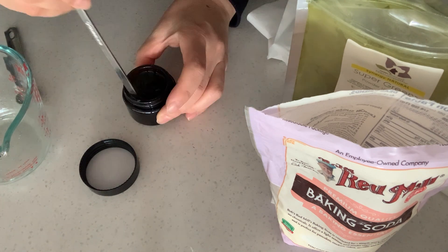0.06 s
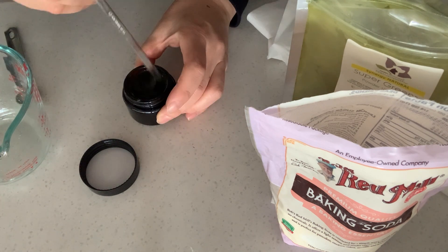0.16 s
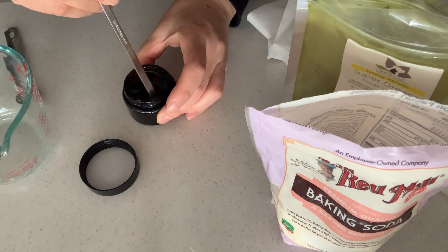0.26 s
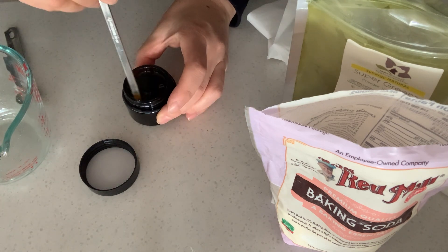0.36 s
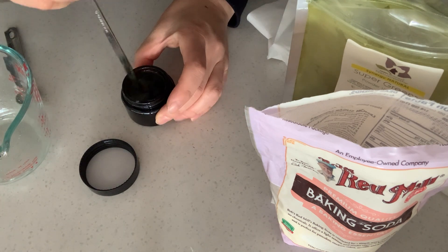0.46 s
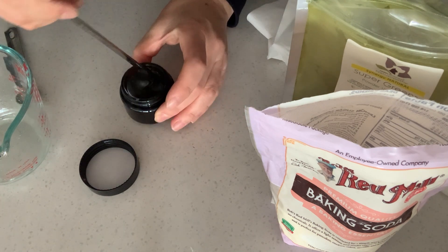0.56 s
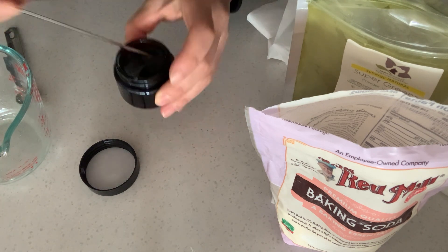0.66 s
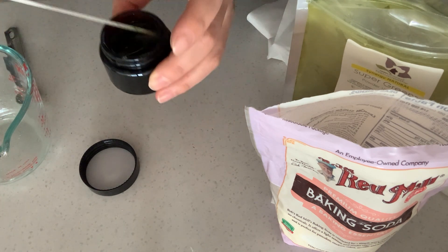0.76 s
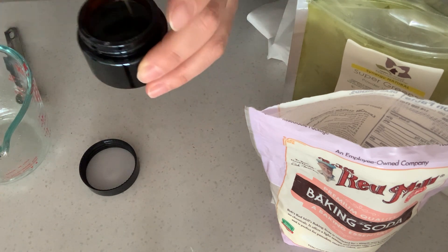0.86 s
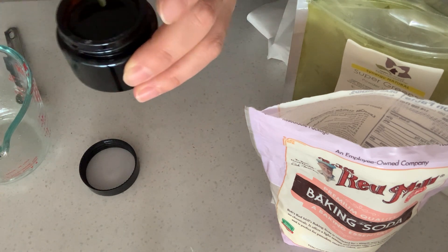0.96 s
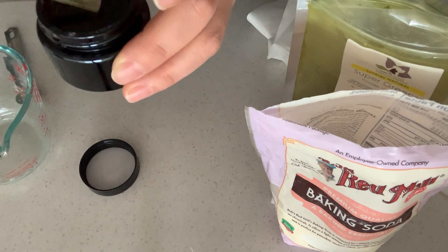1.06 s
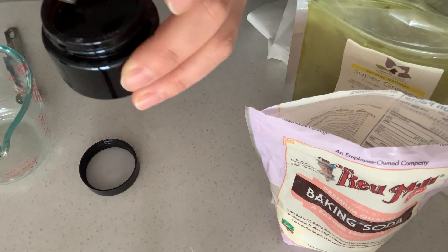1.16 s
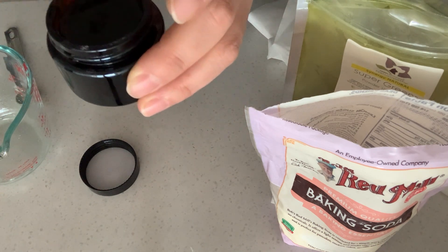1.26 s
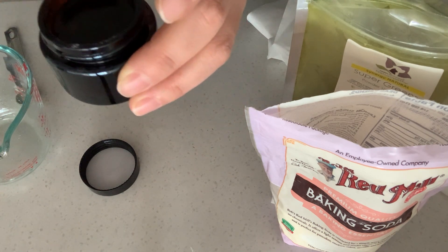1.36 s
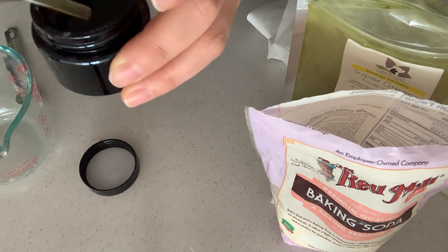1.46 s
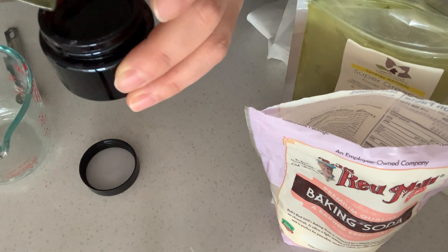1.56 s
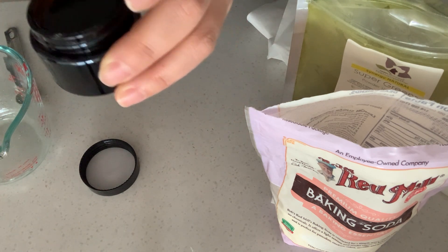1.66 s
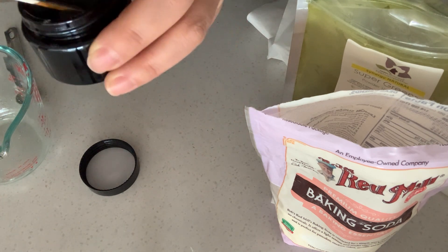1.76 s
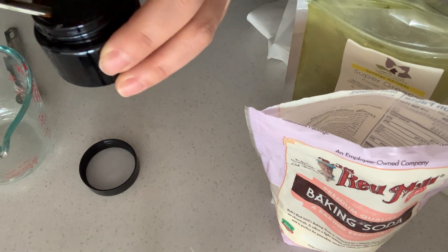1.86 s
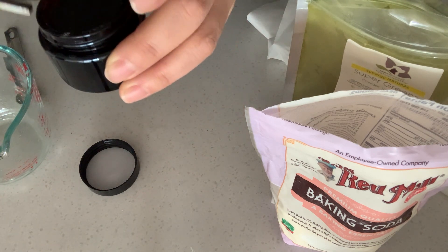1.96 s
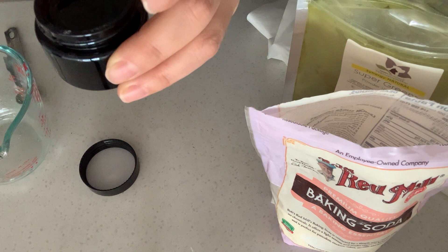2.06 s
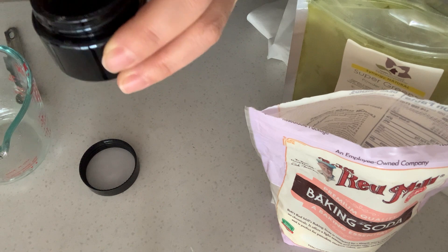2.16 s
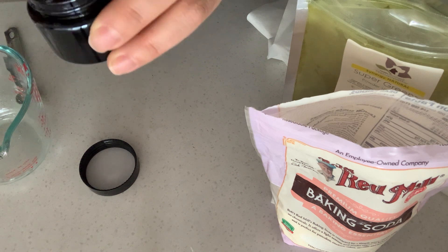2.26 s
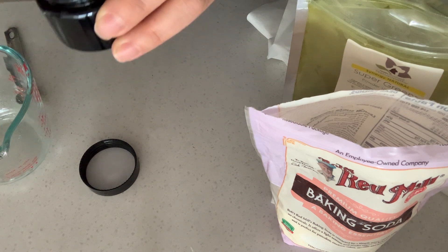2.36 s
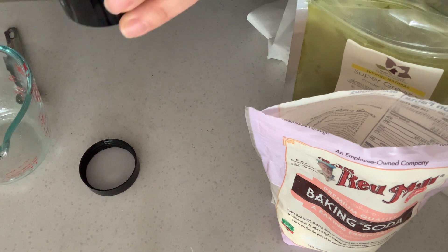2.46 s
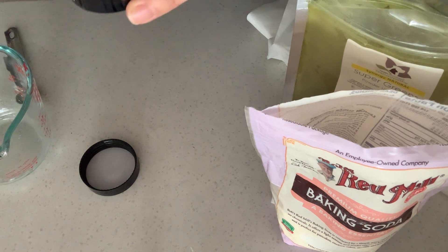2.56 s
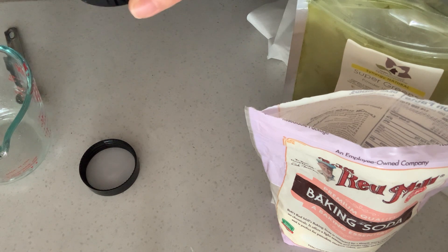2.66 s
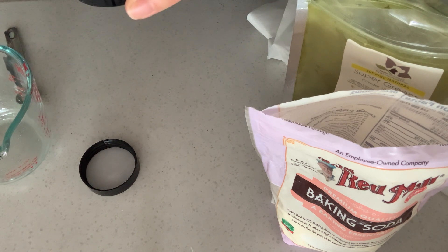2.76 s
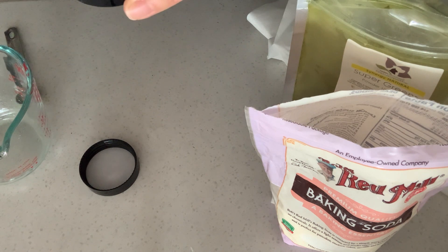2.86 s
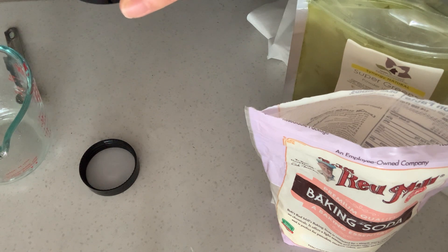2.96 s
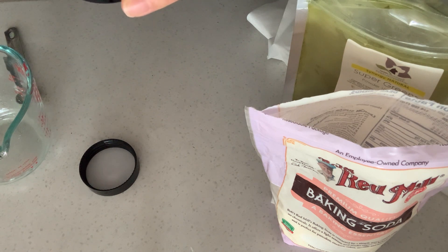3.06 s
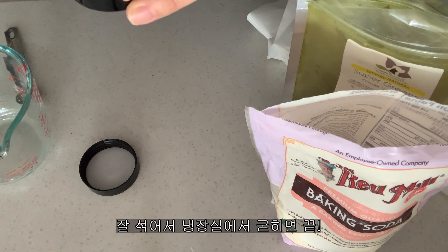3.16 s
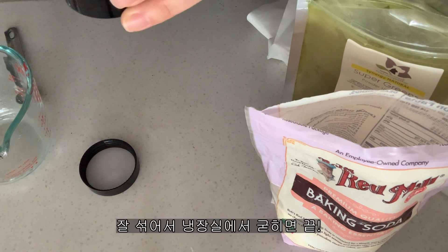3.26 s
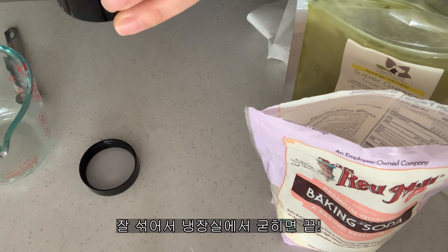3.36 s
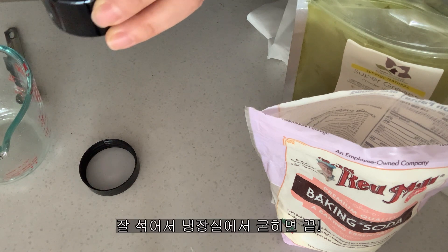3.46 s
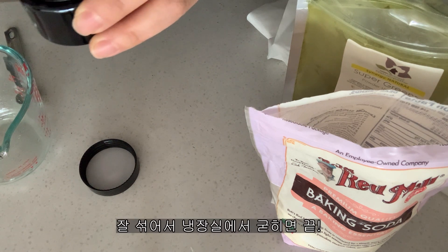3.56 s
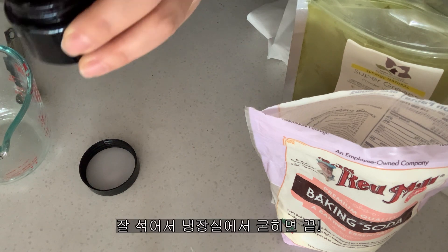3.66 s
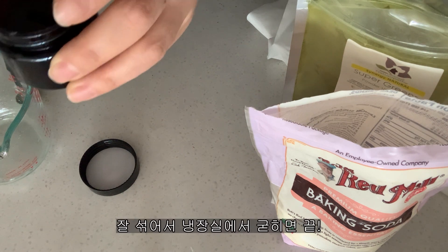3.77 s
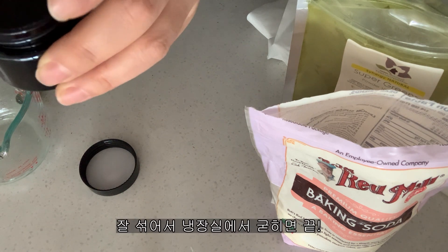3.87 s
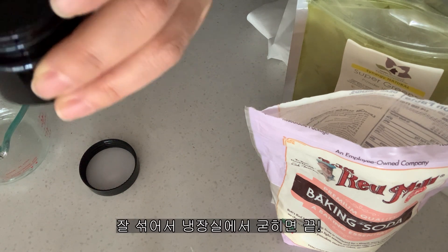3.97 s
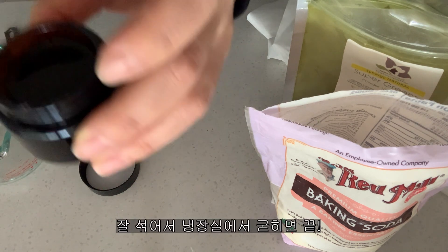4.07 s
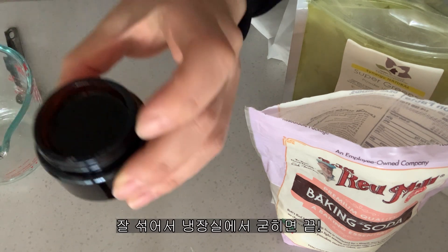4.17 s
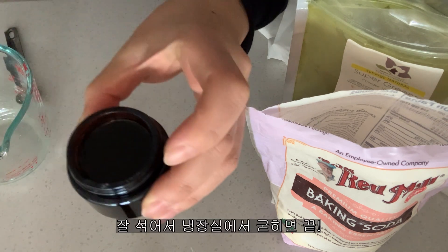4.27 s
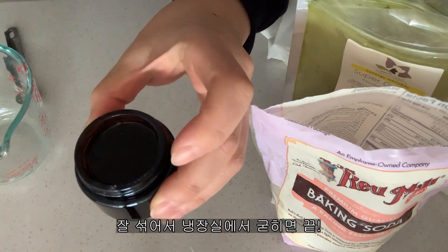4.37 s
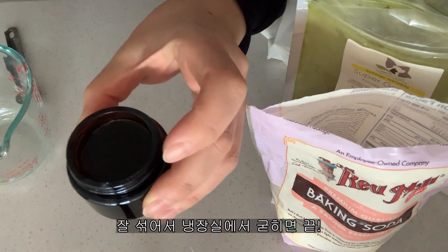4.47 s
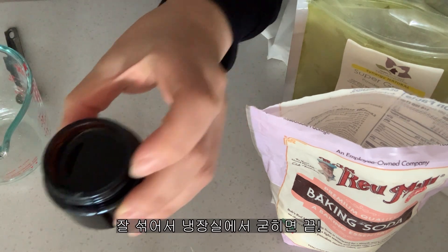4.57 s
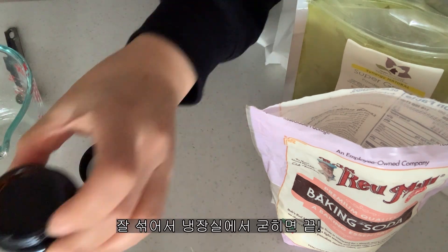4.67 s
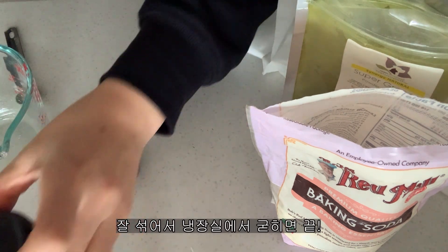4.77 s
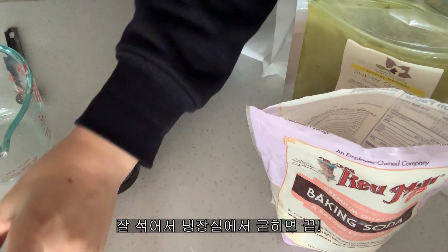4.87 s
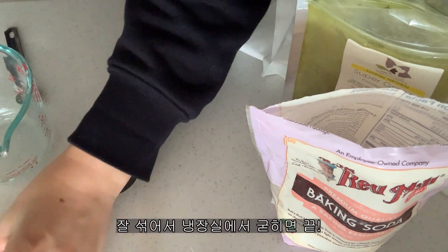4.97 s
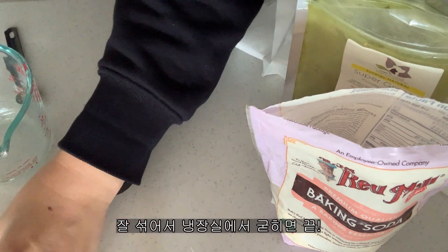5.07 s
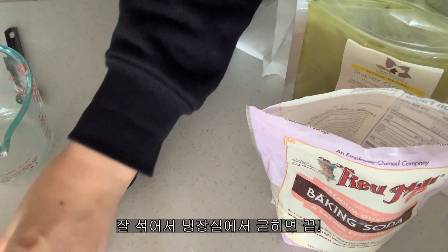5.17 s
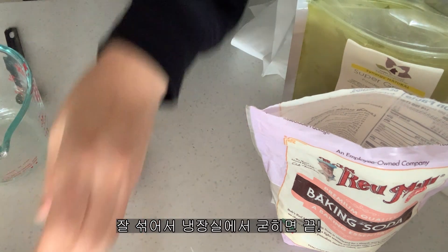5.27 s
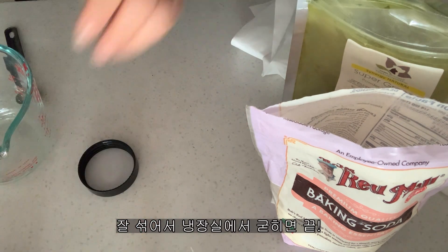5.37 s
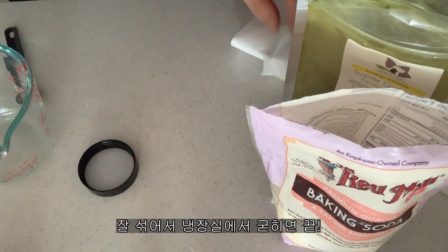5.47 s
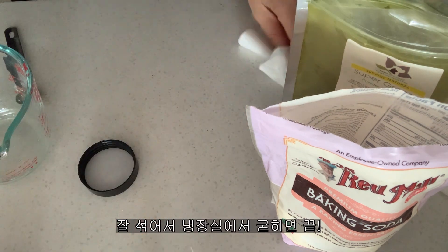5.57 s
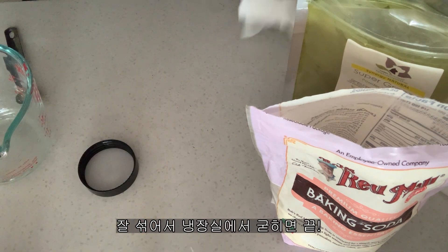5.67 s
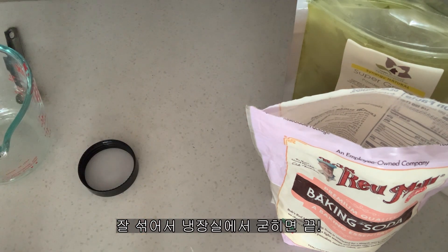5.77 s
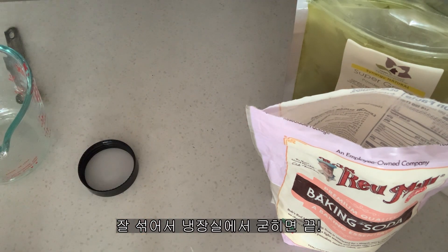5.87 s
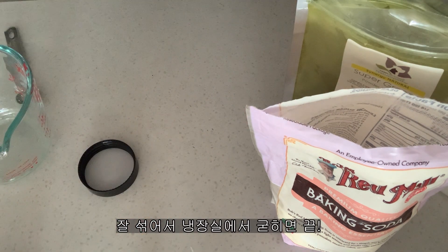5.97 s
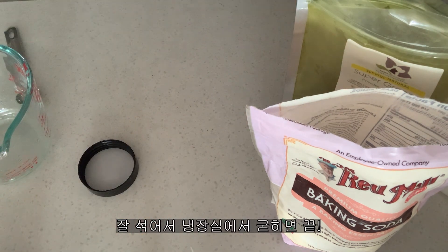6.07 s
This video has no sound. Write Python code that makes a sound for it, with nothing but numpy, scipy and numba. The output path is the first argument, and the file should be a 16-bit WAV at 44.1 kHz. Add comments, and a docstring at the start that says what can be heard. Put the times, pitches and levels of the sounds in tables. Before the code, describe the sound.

Bright metal-on-glass ticks and short scrapes from stirring a little jar, a sharp set-down on stone, then faint squeak and rustle over fridge hum.

```python
"""After a tenth of a second of silence a small glass jar knocks on a counter and scuffs along it.
A metal spatula taps the jar and scrapes the glass; the jar is set down with bounces.
At the end a hand squeaks, bumps and rustles. A fridge hums through a quiet, hard-walled kitchen.
Blows are short rough shocks that ring sets of tones; scrapes and rustles are grainy noise through
filters; the squeak is a stack of narrow noise bands; the hum is a stack of sines."""
import sys
import numpy as np
from scipy import signal
from scipy.fft import rfft, irfft, next_fast_len
from scipy.io import wavfile
from scipy.ndimage import uniform_filter1d
from numba import njit

SR = 44100
rng = np.random.default_rng(int(sys.argv[2]) if len(sys.argv) > 2 else 0)


def put_to_file(sound):
    """Save the sound as 16-bit audio at rate SR, in the file named by the first command-line argument."""
    columns = np.atleast_2d(sound).T  # one column per channel
    safe = np.clip(columns, -1, 1)
    whole_steps = np.round(safe * 32767)
    wavfile.write(sys.argv[1], SR, whole_steps.astype(np.int16))


N = 269892  # length [samples]

# Spatula hits on the jar wall: (time [s], peak level before panning [dB], tilt [dB per octave],
# spatula ring [dB], jar ring [dB])
TAPS = [(0.5896, -54, -1, -19, -9), (0.7233, -51.5, -8.5, 4, 0), (1.1062, -27.5, -1.5, -5, -5.5),
        (1.466, -24, -2.5, 3, -16), (1.787, -23, 2, -5.5, 0.5), (1.8382, -44.5, -5, 8, 7),
        (1.9435, -48.5, 6.5, 6, 0.5), (2.2366, -25.5, 1.5, 8, 9), (2.2905, -33, -0.5, 0, 20),
        (2.4522, -47, 6.5, 1, 19), (2.5256, -43, -3.5, -5.5, 2), (2.9976, -52, 12, 13, -6),
        (3.0295, -28.5, 0, 4.5, 2.5), (3.3782, -18.5, 2.5, 3, -4.5), (3.438, -59, 2, 6, 0),
        (3.6212, -16.5, 4, 8, 8), (3.677, -36.5, 4.5, 6, 3), (3.8302, -39.5, 7, -3, 1),
        (3.845, -57, 8.5, -17, 1.5), (4.1994, -67.5, -4, -9, 9), (4.2697, -50, -7, -23.5, 5),
        (4.3616, -60, -4, -2.5, -3), (4.4684, -60.5, -8, 9, 2), (4.9217, -52.5, -3, -15, 9),
        (5.187, -57, 4.5, -15, 7.5), (5.198, -51.5, 4, -13, -6), (5.234, -47, 8, -12, -12)]
# Tones of the spatula: (frequency [Hz], relative level [dB], time to fall 60 dB [s])
SPATULA = [(5300, -12.5, 0.03), (6980, 8, 0.003), (9380, 9, 0.0073), (10460, 12, 0.015), (10640, -5.5, 0.1),
           (12060, -14, 0.06), (15200, -1.5, 0.035)]
# Tones of the jar while a hand holds it: (frequency [Hz], relative level [dB], time to fall 60 dB [s])
HELD_JAR = [(2180, 1.5, 0.0044), (3840, -0.5, 0.0077), (4600, -6, 0.0037), (5860, -0.5, 0.0062),
            (7940, -10.5, 0.0079)]


def taps():
    """Each tap rings the metal spatula and the hand-held jar together."""
    return blows(TAPS, [SPATULA, HELD_JAR], 0.0023, 22.3, 2200, 17000, roughness=.22)


# Spatula dragged along the glass: (start [s], length [s], relative level [dB], level change [dB],
# squeal at its height [dB], jar ring [dB], blade resonance at start [Hz], at end [Hz],
# middle of its move [0-1 of the stroke])
STROKES = [(1.111, 0.15, -74, -9, 12.5, -8, 4950, 6600, 0.4),
           (1.474, 0.1, -71.5, 0.5, 17.5, -10.5, 5200, 6650, .65),
           (1.796, 0.15, -63, -17, 11.5, -7, 4400, 7600, 0.45),
           (2.229, 0.05, -63, -7, -14, 19, 3870, 4000, 0.4),
           (2.291, 0.03, -73, -16, 8, 11, 3700, 4040, 0.6), (2.516, 0.037, -79, -6, 22, 2, 7070, 7410, .5),
           (3.064, 0.15, -69, -10, 9, -5.5, 3700, 8100, .65),
           (3.371, 0.07, -58, -2.5, -2, -4.5, 5280, 6500, 0.7),
           (3.617, 0.041, -45, -16, -9, 0, 4840, 5080, .5),
           (3.676, 0.024, -61, -5.5, 8, -7, 5300, 5900, 0.14),
           (3.833, 0.034, -70, -13, 8, 3.5, 4600, 2740, 0.52)]
STROKE_ATTACK_S, STROKE_RELEASE_S = 0.0029, 0.013
SWEEP_SPREAD = .15  # share of the stroke over which the blade resonance makes most of its move
# The squeal peaks this share of the stroke after the middle of the move, and drops to either side
SQUEAL_AFTER, SQUEAL_SPREAD, SQUEAL_DROP_DB = 0.1, 0.3, 10
LOW_MODE, LOW_MODE_DB = .43, -16.5  # a lower blade resonance moves along at this share of the upper
# Tone of the dry scraping: (frequency [Hz], relative level [dB])
SCRAPE_TONE = [(1500, -14.0), (3500, -14.0), (9500, 15.5), (11500, -5.0), (16000, -20.5)]


def scrape():
    """Gritty friction rings the moving resonance of the free blade, the spatula's fixed tones and the jar."""
    grit = rng.standard_normal(N) * amp(2.5 * rng.exponential(size=N) + 2.5 * walk(200))
    blade_hz, drag, squeal, glass = np.full(N, 6000.), 0, 0, 0
    for s, length_s, db, change_db, squeal_db, jar_db, from_hz, to_hz, middle in STROKES:
        along, gain = stroke(s, length_s, db, change_db, STROKE_ATTACK_S, STROKE_RELEASE_S)
        moved = (1 + np.tanh((along - middle) / SWEEP_SPREAD)) / 2
        blade_hz = np.where(along > 0, from_hz + (to_hz - from_hz) * moved, blade_hz)
        drag = drag + gain
        glass = glass + gain * amp(jar_db)
        off_peak = (along - middle - SQUEAL_AFTER) / SQUEAL_SPREAD
        squeal = squeal + gain * amp(squeal_db - SQUEAL_DROP_DB * off_peak ** 2)

    sound = amp(4.0) * unit(colour(grit, SCRAPE_TONE))
    for hz, db, t60 in SPATULA:
        gathered = (t60 / 0.0053) ** 0.94  # longer rings gather more
        sound += amp(db - 13.5) * gathered * unit(svf(grit, np.full(N, 1. * hz), 430.0))

    tremble = 1 + .05 * walk(80)  # the grip trembles
    jar = sum(amp(db + 3.0 * walk(60)) * unit(svf(grit, hz * tremble, 450.0)) for hz, db, _ in HELD_JAR)

    blade_hz = blade_hz * tremble
    low_hz = LOW_MODE * blade_hz
    catching = amp(5 * walk(70))  # it catches and lets go
    upper = unit(svf(svf(grit, blade_hz, 1500.0), blade_hz, 1500.0)) * catching
    lower = unit(svf(svf(grit, low_hz, 600.0), low_hz, 600.0))
    blade = upper + amp(LOW_MODE_DB) * lower
    return amp(-5.5) * (drag * sound + amp(-17.0) * glass * jar + squeal * blade)


# Jar rocking on the counter: (time [s], peak level before panning [dB], tilt [dB per octave],
# jar ring [dB])
KNOCKS = [(0.113, -38, 6, -16.5), (0.189, -34, -4, -16), (0.296, -27.5, 3.5, 11), (0.348, -39.5, 3.5, 8.5),
          (0.483, -59, -4, 1), (0.495, -51.5, 0, 8.5), (0.529, -43, 4, 8)]
# Tones of the jar on the counter: (frequency [Hz], relative level [dB], time to fall 60 dB [s])
JAR = [(550, 1.5, 0.016), (773, -8, 0.059), (990, 1, 0.0088), (1474, -6, 0.05), (1884, -2.5, 0.014),
       (2310, 5, 0.012), (2820, -7, 0.0061), (3210, -12.5, 0.0058), (4600, -7, 0.0056),
       (6070, -9.5, 0.0084), (6880, -0.5, 0.0013), (10000, -13, 0.011)]


def knocks():
    """Each knock of the rocking jar on the counter rings the jar's tones."""
    return blows(KNOCKS, [JAR], 0.0028, 22.7, 810, 3470, roughness=0.22)


# Jar sliding on the counter: (start [s], length [s], level [dB], level change [dB])
SCUFFS = [(0.462, 0.041, -55, -1), (0.505, 0.017, -59.5, -10.5)]
# Tone of the slides: (frequency [Hz], relative level [dB])
SCUFF_TONE = [(700, -29), (1500, 7), (2300, 7.5), (3000, -3.5), (4500, -9.5), (9000, -21), (16000, -37)]


def scuff():
    """Grainy glass-on-stone slides: spiky noise with a fixed tone."""
    grit = rng.standard_normal(N) * amp(2.5 * rng.exponential(size=N) + 3.5 * walk(150))
    return unit(colour(grit, SCUFF_TONE)) * sum(stroke(*row, 0.019, 0.0066)[1] for row in SCUFFS)


# Jar set down with bounces: (time [s], peak level before panning [dB], tilt [dB per octave], ring [dB])
LANDING = [(4.967, -13, -1.5, 2), (4.9759, -14.5, 3, 12.5), (4.98, -25.5, -7.5, -11),
           (4.99, -36, -1.5, -15), (5.001, -33, -4.5, -12)]
# Tones of the counter: (frequency [Hz], relative level [dB], time to fall 60 dB [s])
COUNTER = [(114, -22.5, 0.094), (227, -26.5, 0.1), (365, -13, 0.022), (583, -13, 0.042), (1180, -7, 0.032),
           (1303, -9.5, 0.043), (1760, -6, 0.06), (2170, 0, 0.0057), (2630, -2.5, 0.021), (2910, 6, 0.013),
           (3250, 3, 0.0081), (3615, -1, 0.029), (4350, -7, 0.0043), (5300, 1, 0.01)]


def landing():
    """The jar lands and bounces, ringing the counter; also returns the version that feeds the echo."""
    landed = blows(LANDING, [COUNTER], 0.0027, 26.1, 1500, 3400, roughness=0.21)
    # the walls get more crack, less ring
    cracks = [(s, db, tilt, ring - 8) for s, db, tilt, ring in LANDING]
    to_walls = blows(cracks, [COUNTER], 0.0042, 55.0, 1300, 4300, roughness=0.35)
    return landed, to_walls


# Skin squeaking over a smooth face: (start [s], length [s], relative level [dB], level change [dB])
SQUEAK = (5.31, .2, -82.5, 2)
# Bands of the squeak: (multiple of the slip rate, relative level [dB])
SQUEAK_ORDERS = [(2, 0), (4, 4.5), (5, -3), (6, 1), (7, -1.5), (8, -18)]
SLIP_HZ, SLIP_RISE_HZ = 1000, 20  # mean slip rate at the start, its rise to the end


def squeak():
    """Unsteady stick-slip: each multiple is a narrow noisy band that comes and goes."""
    along, gain = stroke(*SQUEAK, .02, .015)
    slip_hz = SLIP_HZ + SLIP_RISE_HZ * along
    stack = 0
    for k, db in SQUEAK_ORDERS:
        band_hz = k * slip_hz * (1 + 0.029 * walk(32))
        band = unit(svf(rng.standard_normal(N), band_hz, 260.0))
        stack = stack + amp(db + 6 * walk(29.79)) * band
    return stack * gain


# Knuckle on the cabinet: (time [s], peak level before panning [dB], tilt [dB per octave], ring [dB])
BUMP = [(5.579, -34.5, 4.5, 3), (5.598, -58, 16, 3)]
# Tones of the cabinet: (frequency [Hz], relative level [dB], time to fall 60 dB [s])
CABINET = [(45.4, -19, 0.19), (76, -1.5, 0.26), (205, 3.5, 0.041), (440, 0, 0.031), (660, -0.5, 0.019)]


def bump():
    """A knuckle rings the low tones of the cabinet."""
    return blows(BUMP, [CABINET], 0.0038, -13, 25, 900)


# Paper and sleeve rustling: (time [s], level [dB])
RUSTLE = [(5.44, -101), (5.502, -66), (5.608, -61.5), (5.64, -69), (5.694, -71.5), (5.718, -79),
          (5.758, -70), (5.854, -76), (5.898, -66), (5.976, -69), (6.07, -71.5), (6.12, -54.5)]
# Tone of the rustle: (frequency [Hz], relative level [dB])
RUSTLE_TONE = [(500, -28), (800, -3.5), (1300, -5.5), (3000, -8.5), (9300, -8.5), (12000, -12.5),
               (13000, -16), (16000, -39)]


def rustle():
    """Patchy crinkling: grainy bands, each swelling on its own, wide across both channels."""
    out = 0
    grains = amp(3.2 * rng.exponential(size=(2, N)) + 1.2 * walk(70))
    for hz in 707 * np.sqrt(2) ** np.arange(9):
        band = signal.butter(1, [hz / 1.2, hz * 1.2], "band", fs=SR, output="sos")
        swell = amp(5.7 * walk(28) + 1.2 * walk(140))
        out = out + signal.sosfilt(band, grains * rng.standard_normal((2, N))) * swell
    level_db = np.interp(np.arange(N) / SR, *np.transpose(RUSTLE), left=-140)
    mid, side = unit(colour(out, RUSTLE_TONE)) * amp(level_db)
    return np.array([mid + 1.0 * side, mid - 1.45 * side])


# Fridge compressor: (multiple of the shaft rate, mean rms level [dB], lead of the left channel [rad])
HUM = [(2, -38.5, 0.52), (3, -74.5, 0.6), (4, -75.5, 0.54), (6, -69.5, 0.99), (7, -70, 1.2), (9, -80, 1.7),
       (11, -77, 1.7), (14, -74.5, 1.5), (18, -78.5, 1.5), (20, -76.5, 1.91)]
SHAFT_HZ = 42.41  # mean rate


def fridge():
    """The compressor hums at multiples of its shaft rate; the weak ones flutter more."""
    turn = 2 * np.pi * np.cumsum(SHAFT_HZ * (1 + 0.0022 * walk(2.8))) / SR
    tilt_db = np.array([[-.55], [.55]])  # left a little softer than right
    out = 0
    for k, db, lead in HUM:
        flutter_db = .5 * walk(11) if k == 2 else 4.0 * walk(22)
        phase = rng.uniform(0, 2 * np.pi) + np.array([[lead], [-lead]]) / 2
        phase = phase + 0.06 * (k - 2) * walk(30)
        out = out + np.sqrt(2) * amp(db + flutter_db + tilt_db) * np.sin(k * turn + phase)
    return out


# Air of the kitchen, part common to both channels: (frequency [Hz], relative level [dB])
AIR_MID = [(30, -40.5), (60, -28.5), (110, -22), (140, -18), (206, -25), (269, -22.5), (417, -33),
           (595, -27), (703, -35.5), (941, -33.5), (1600, -41.5), (2780, -56), (9500, -60), (11500, -66.5),
           (16000, -86.5)]
# Air of the kitchen, part opposed between the channels: (frequency [Hz], relative level [dB])
AIR_SIDE = [(30, -39), (60, -12), (110, -9.5), (275, -32), (435, -33), (547, -26.5), (674, -27.5),
            (848, -24), (1090, -30.5), (1620, -31), (2500, -48), (12200, -59), (16000, -85)]
AIR_MID_DB, AIR_SIDE_DB = -64.5, -62.5  # mean rms levels


def air():
    """Room noise, unsteady in the lows, smooth in the treble."""
    mid = unit(colour(patchy(30, count=19, depth_db=4.0, rate=9), AIR_MID))
    side = unit(colour(patchy(30, count=19, depth_db=0.5, rate=9), AIR_SIDE))
    mid = mid * amp(AIR_MID_DB + 0.61 * walk(5.4))
    side = side * amp(AIR_SIDE_DB + 1.2 * walk(6.9))
    return np.array([mid + side, mid - side])


# Diffuse echo: (frequency [Hz], time to fall 60 dB [s], relative level [dB])
ROOM = [(144, 0.89, 0), (557, 0.37, 1.5), (1000, 0.46, -5), (1640, 0.28, -1.5), (2670, 0.22, 0),
        (4040, 0.18, -2), (6200, 0.19, -7.5), (10000, 0.061, -4)]


def kitchen(x):
    """Diffuse echo: noise bands that die at their own rates, another draw for each channel."""
    t = np.arange(SR // 2) / SR
    tail = np.zeros((2, len(t)))
    for hz, t60, db in ROOM:
        band = signal.butter(2, [hz / 1.5, hz * 1.5], "band", fs=SR, output="sos")
        noise = signal.sosfilt(band, rng.standard_normal(tail.shape))
        tail += amp(db) * noise * 1000. ** (-t / t60)
    tail *= 1 - np.exp(-t / 0.0018)  # the echo builds up within a few ms
    tail /= np.sqrt(np.sum(tail ** 2) / 2)
    return signal.fftconvolve(x[None], tail, axes=1)[:, :N]


def blows(events, bodies, contact_s, crack_db, low_hz, high_hz, roughness=.14):
    """A rough contact of a few ms rings each body, at a new spot each time, tilted by its hardness."""
    out, t = np.zeros(N + SR), np.arange(SR // 2) / SR
    f = np.maximum(np.arange(SR // 4 + 1) * 2., 20)
    hz, db, t60 = (c[:, None] for c in np.concatenate(bodies).T)
    fade = 1000. ** (-t / t60)
    # the crack is the part without ring, kept between low_hz and high_hz
    crack = amp(crack_db) / np.sqrt((1 + (low_hz / f) ** 4) * (1 + (f / high_hz) ** 6))
    octaves = np.log2(np.maximum(f, 150) / 3000)
    for s, peak_db, tilt_db, *ring_db in events:
        spot = rng.standard_normal((2, len(hz), 1))
        share_db = np.repeat(ring_db, [len(b) for b in bodies])[:, None]
        tone = np.sin(2 * np.pi * hz * (1 + 0.011 * spot[1]) * t)
        ring = amp(db + share_db + 2.0 * spot[0]) * tone * fade
        ring[1::2] *= -1  # neighbouring tones move in opposite senses, which fills the valleys
        contact = roughness * rng.standard_normal(len(t)) * np.exp(-t / contact_s)
        contact[SR // 2500] += 1  # the main shock follows the first touch
        body = rfft(ring.sum(0)) + crack
        blow = irfft(rfft(contact) * body * amp(tilt_db * octaves))
        i = int(s * SR)
        out[i:i + len(t) // 2] += amp(peak_db) * blow[:len(t) // 2] / np.abs(blow).max()
    return out[:N]


def stroke(s, length_s, db, change_db, attack_s, release_s):
    """Progress 0-1 and gain of one movement: attack, a steady drift in level, release."""
    t = np.arange(N) / SR - s
    along = np.clip(t / length_s, 0, 1)
    ends = np.clip(t / attack_s, 0, 1) ** 2 * np.exp(-np.maximum(t - length_s, 0) / release_s)
    return along, amp(db + change_db * along) * ends


def patchy(low_hz, count, depth_db, rate):
    """Noise whose half-octave bands swell and sink on their own, less so in the treble."""
    out = 0
    for hz in low_hz * np.sqrt(2) ** np.arange(count):
        band = signal.butter(1, [hz / 1.19, min(hz * 1.19, 20000)], "band", fs=SR, output="sos")
        swell = amp(depth_db / (1 + hz / 2000) * walk(rate))
        out = out + signal.sosfilt(band, rng.standard_normal(N)) * swell
    return out


def walk(rate):
    """Random levels held 1 / rate s and smoothed twice."""
    k = int(SR / rate)
    steps = np.repeat(rng.standard_normal(N // k + 1), k)
    return uniform_filter1d(uniform_filter1d(steps, k), k)[:N]


@njit
def svf(x, hz, width):
    """Band-pass with a moving centre, gain 1 there; width in Hz."""
    y, b, l = np.empty(len(x)), 0., 0.
    for i in range(len(x)):
        g, k = np.tan(np.pi * hz[i] / SR), width / hz[i]
        v = (b + g * (x[i] - l)) / (1 + g * (g + k))
        b, l, y[i] = 2 * v - b, l + 2 * g * v, k * v
    return y


def colour(x, spectrum):
    """Filter by (frequency [Hz], level [dB]) points."""
    hz, db = np.transpose(spectrum)
    n = next_fast_len(N)
    f = np.maximum(np.arange(n // 2 + 1) * SR / n, 1)
    return irfft(rfft(x, n) * amp(np.interp(np.log(f), np.log(hz), db)), n)[..., :N]


def amp(db):
    """Turn dB into an amplitude factor."""
    return 10 ** (np.asarray(db) / 20)


def unit(x):
    """Scale to an rms of 1."""
    return x / np.sqrt(np.mean(x ** 2))


def place(x, lag_s, pan_db):
    """The sound reaches the right channel lag_s later; pan_db is left level over right."""
    n = next_fast_len(N)
    delay = np.exp(-2j * np.pi * np.arange(n // 2 + 1) * SR / n * lag_s)
    late = irfft(rfft(x, n) * delay, n)[:N]
    return np.array([x * amp(pan_db / 2), late * amp(-pan_db / 2)])


def scene():
    """Place each source, add its echo, then the rustle, fridge and air."""
    held = taps() + scrape()
    rocked = knocks() + scuff()
    landed, to_walls = landing()
    hand = bump() + squeak()
    direct = place(held, 3.6e-5, -2.5) + place(rocked, 3e-5, -2.9)
    direct = direct + place(landed, 3e-5, -2.0) + place(hand, 1e-5, 0.034)
    echo = kitchen(amp(-13.5) * held + amp(-8.0) * rocked + amp(-4.5) * to_walls + amp(-12.5) * hand)
    return direct + echo + rustle() + fridge() + air()


START_S, TOP_HZ = .113, 16500  # end of the silence, upper limit of the treble


def record(dry):
    """The sound sets in after a short silence; the top is cut."""
    on = np.clip((np.arange(N) / SR - START_S) / 0.00039, 0, 1)
    return signal.sosfilt(signal.ellip(8, .2, 70, TOP_HZ, fs=SR, output="sos"), dry * on)


dry = scene()
out = record(dry)
put_to_file(out)
```